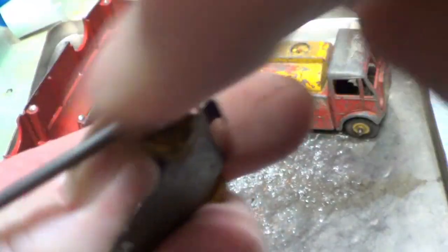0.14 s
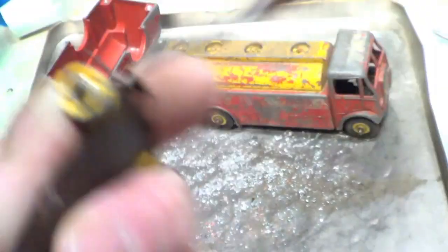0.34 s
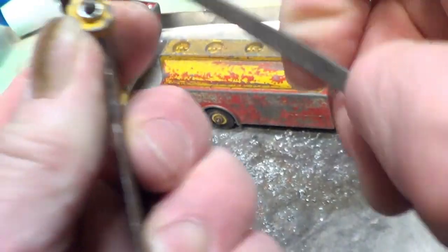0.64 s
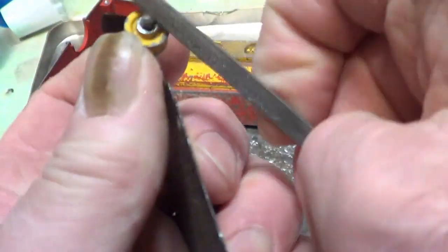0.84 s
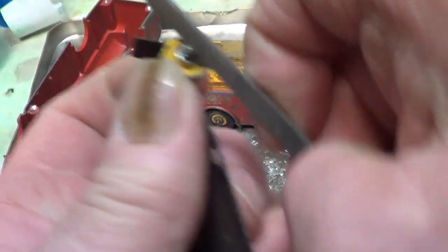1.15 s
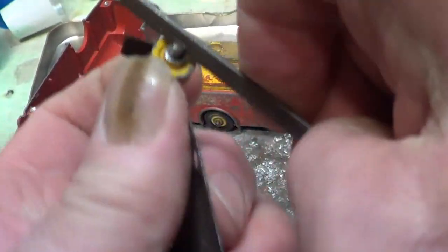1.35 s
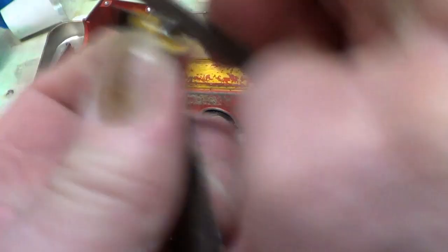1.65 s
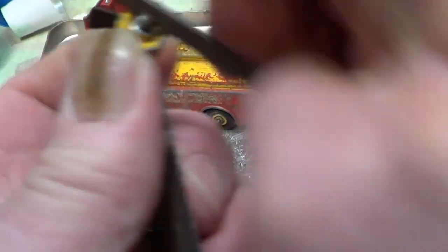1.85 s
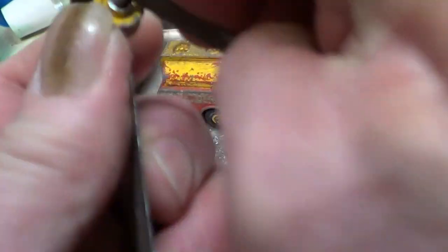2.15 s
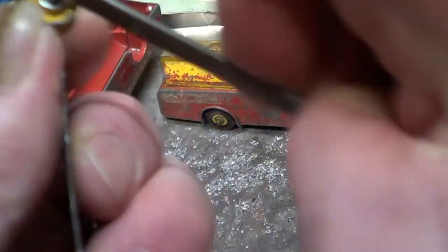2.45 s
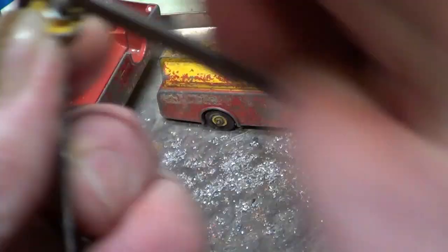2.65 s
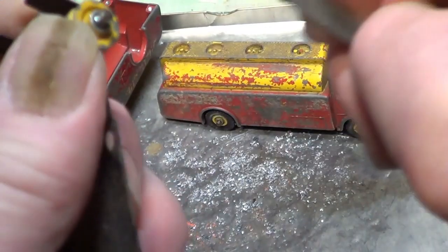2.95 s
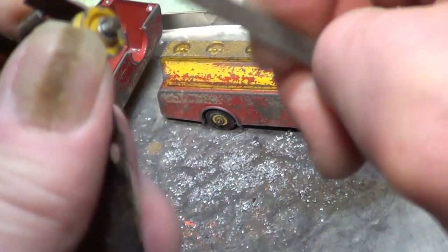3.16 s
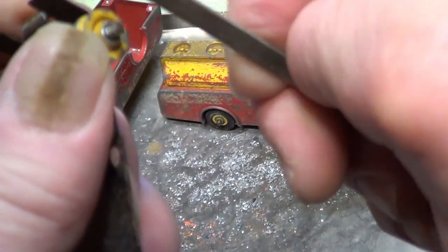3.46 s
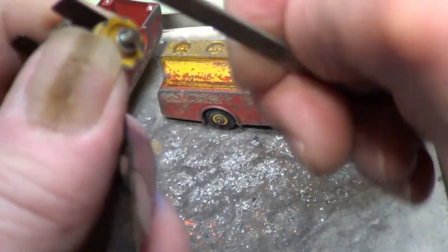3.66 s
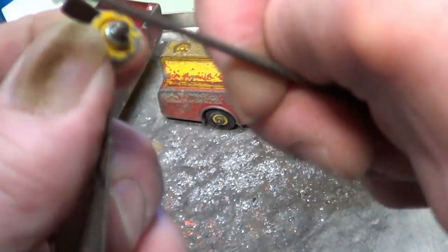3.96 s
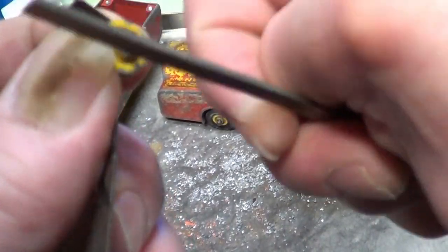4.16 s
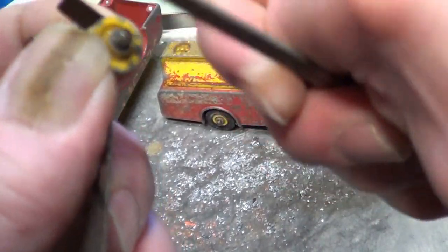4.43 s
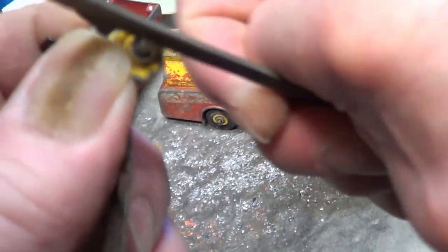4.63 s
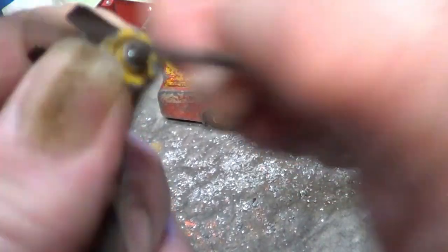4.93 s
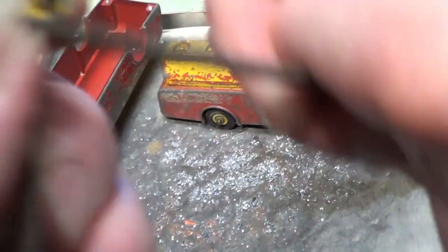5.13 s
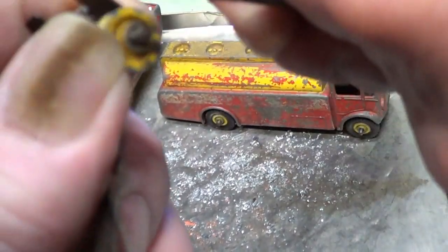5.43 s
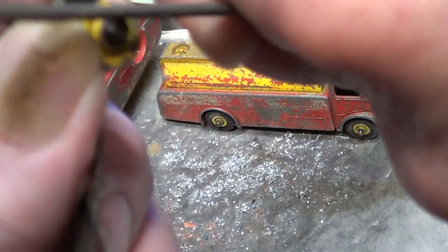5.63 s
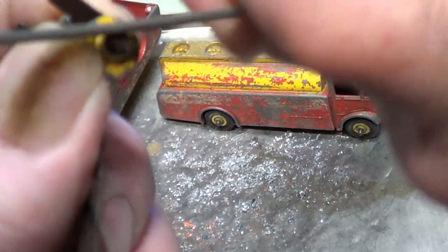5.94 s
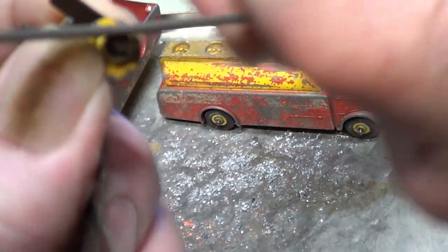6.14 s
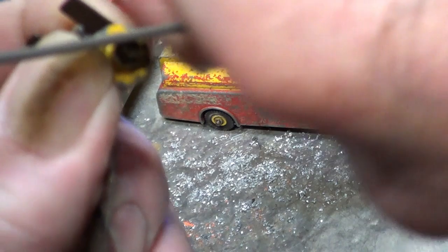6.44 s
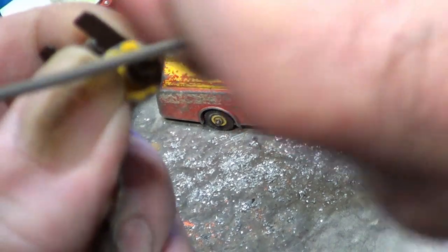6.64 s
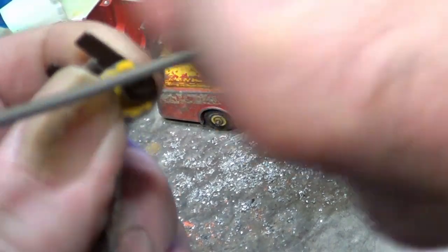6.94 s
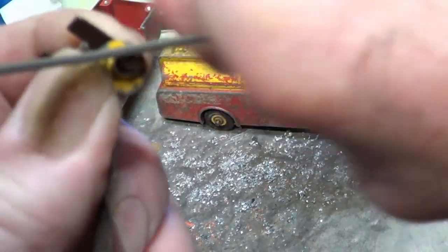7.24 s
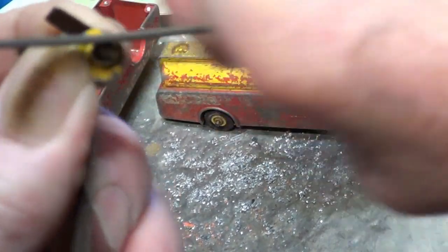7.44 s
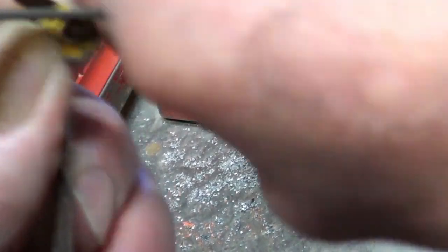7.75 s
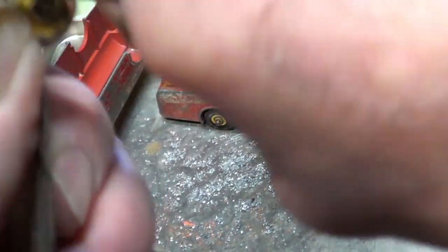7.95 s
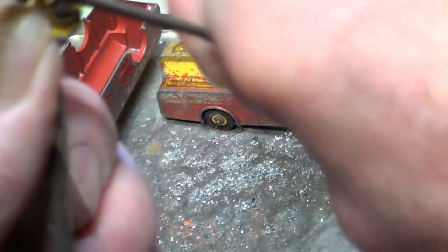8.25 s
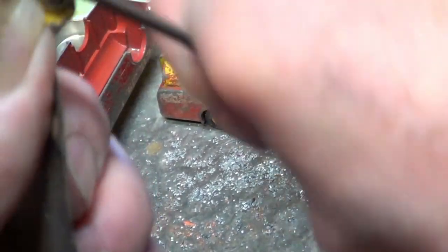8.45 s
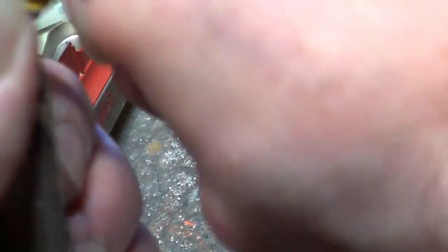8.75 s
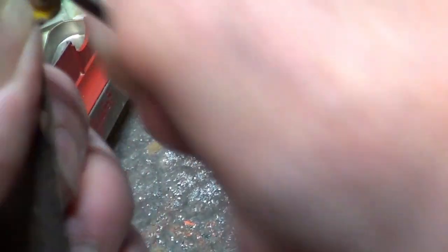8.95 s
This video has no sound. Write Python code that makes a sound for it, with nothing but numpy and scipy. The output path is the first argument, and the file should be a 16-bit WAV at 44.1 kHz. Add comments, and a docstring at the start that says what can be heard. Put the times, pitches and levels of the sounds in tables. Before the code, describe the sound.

Close and dry, in a quiet workshop with faint hiss. From 0 to 0.4 s a few file strokes rasp on metal, growing stronger. A pause follows, with small ticks around 0.65 to 1.05 s. At about 1.2 s filing resumes, soon quick and uneven, push and pull alternating around ten a second, bright, gritty and skipping, loudest around 1.6 s and 2.5 s, stopping at 2.75 s with a sharp tap. Near-silence lasts until about 4.2 s, then come faint ticks, a soft scrape at 4.6 s and harder clicks near 4.95 and 5.1 s. From 5.6 s fine strokes begin softly and settle into a steady, rapid sawing with alternating buzzy notes, low on the push and higher, arching on the pull. From about 7.8 s it becomes rougher, with small taps, continuing to the end at 9.1 s. Thin steel ringing colours each stroke.

```python
"""A small steel file rasps to and fro over the end of a toy axle held in the fingers, heard from close by.
Teeth and grit scrape the axle. The teeth pass at a rate heard as a low note, which falls on a push and
arches on a pull, while file and chassis ring briefly. The file also brushes and taps the work, mostly in
the pauses. Chance grains and pulses drive resonances, with close reflections and a workshop hush behind."""
import sys
import numpy as np
from scipy import signal
from scipy.io import wavfile
from scipy.ndimage import uniform_filter1d

SR = 44100
rng = np.random.default_rng(int(sys.argv[2]) if len(sys.argv) > 2 else 0)


def bounce(signal):
    """Save signal as a 16-bit WAV file at the path given by the first command-line argument."""
    frames = np.transpose(np.atleast_2d(signal))
    limited = np.clip(frames, -1, 1)
    pcm = np.round(limited * 32767).astype(np.int16)
    wavfile.write(sys.argv[1], SR, pcm)


N = 400869

# colour of the rasp with the file held steeply: pitch_hz [Hz], level_db [dB per Hz]
STEEP = [(24, -66.5), (40, -38.5), (155, -28.5), (479, -15), (1180, -14.5), (2100, -3), (2910, -9),
         (5720, -7), (7730, -6), (9220, -5.5), (10400, -9.5), (13100, -17), (16000, -26.5)]
# colour with the file laid flat: pitch_hz [Hz], level_db [dB per Hz]
FLAT = [(24, -102), (40, -46.5), (320, -14.5), (479, -12), (1520, -12.5), (1810, -1.5), (2500, -1.5),
        (3560, -7), (5580, -4), (8340, 6.5), (11600, 1), (14800, -6.5), (16000, -3)]
# colour of the opening strokes, named in the table of grips: pitch_hz [Hz], level_db [dB per Hz]
UNDER = [(24, -70), (40, -40), (269, -16.5), (312, -25), (363, -17.5), (646, -19), (1150, -22),
         (1630, -11.5), (1760, -5), (2100, -3), (3470, -19), (4240, -2.5), (4680, -10), (9690, -1.5),
         (16000, -27.5)]


def gain_of(db):
    """Turns decibels into a factor on the sound pressure."""
    return 10 ** (np.asarray(db) / 20)


def evened(x):
    """Scales a signal to an average strength (RMS) of one."""
    return x / np.sqrt(np.mean(x ** 2) + 1e-20)


def read(points, hz):
    """Reads a table over pitch, with straight lines on a logarithmic pitch scale."""
    f, value = np.transpose(points)
    return np.interp(np.log(hz + 1), np.log(f + 1), value)


def at_time(points, s):
    """Reads a table over time, with straight lines between its points."""
    return np.interp(s, *np.transpose(points))


def drift(per_s):
    """Wanders by chance with unit strength, through per_s random points a second."""
    knots = rng.standard_normal(int(N / SR * per_s) + 2)
    return evened(np.interp(np.arange(N) * per_s / SR, np.arange(len(knots)), knots))


def colour(points, lo_hz, hi_hz):
    """Makes a filter of unit energy from the part of a spectrum between two soft edges."""
    hz = abs(np.fft.fftfreq(4096, 1 / SR)) + 1
    edges = 1 / (1 + (lo_hz / hz) ** 8) / (1 + (hz / hi_hz) ** 8)
    log_gain = np.log(gain_of(read(points, hz)) * np.sqrt(edges) + 1e-5)
    # minimum phase: the filter answers at once, never before its input
    response = np.fft.ifft(np.exp(np.conj(signal.hilbert(log_gain)))).real[:2048]
    return response / np.linalg.norm(response)


def resonate(x, hz, width):
    """A moving resonance: shifts the pitch curve hz down to zero, smooths, and shifts back."""
    turn = np.exp(2j * np.pi * np.cumsum(hz) / SR)
    r = np.exp(-np.pi * width / SR)
    smooth = signal.lfilter([1 - r], [1, -r], x / turn + 1e-18)
    return 2 * (turn * smooth).real


def hush():
    """Room and microphone noise: random spectra with faint drifting patches, partly alike left and right."""
    # loudness of the hush: time_s [s], level_db [dB]
    loudness = [(0, -48.5), (.45, -54.5), (.8, -59), (2.75, -55.5), (3.251, -61), (3.75, -58.5),
                (4.599, -58), (5.5, -60), (9.09, -48.5)]
    # its colour: pitch_hz [Hz], level_db [dB per Hz]
    spectrum = [(24, -59), (40, -29), (155, -13), (312, -12), (422, -4.5), (770, -13), (942, -8),
                (1370, -13), (8340, -13), (16000, -18)]
    # how alike left and right are: pitch_hz [Hz], likeness [-1 to 1]
    likeness = [(60, 0.49), (180, 0.11), (550, -0.018), (1650, 0.49), (4970, 0.095), (15000, 0.7)]
    frames, hz = N // 256 + 5, np.fft.rfftfreq(1024, 1 / SR)
    a, b, c, d, patches = rng.standard_normal((frames, 513, 5)).T
    patches = evened(uniform_filter1d(uniform_filter1d(patches, 20, 0), 16, 1))
    same = np.clip(read(likeness, hz), -1, 1)[:, None]
    left = a + 1j * b
    right = same * left + np.sqrt(1 - same ** 2) * (c + 1j * d)
    z = np.array([left, right]) * gain_of(read(spectrum, hz)[:, None] + 1.7 * patches)
    noise = evened(signal.istft(z, nperseg=1024, noverlap=768)[1][:, :N])
    return gain_of(at_time(loudness, np.arange(N) / SR)) * noise


def bench(x):
    """Close reflections off hands and bench, then a faint room: sparse echoes, other ones for each side."""
    at = np.arange(30, 16000, 20) + rng.integers(0, 20, (2, 799))
    tail, t = np.zeros((2, 16100)), at / SR
    # each part falls by 60 dB in the time it is divided by, in seconds
    decay = gain_of(-60 * t / .015) + gain_of(-12 - 60 * t / 0.12) + gain_of(-43 - 60 * t / .5)
    np.put_along_axis(tail, at, rng.choice([-1., 1.], at.shape) * decay, 1)
    # small surfaces return little bass
    thin = signal.lfilter(*signal.butter(1, [800, 13000], "bandpass", fs=SR), x)
    return signal.oaconvolve(thin[None], tail / np.linalg.norm(tail[0]), axes=1)[:, :N]


def ring(x, wander_db, per_s):
    """Modes of file and chassis; each is driven more or less as the point of contact moves."""
    # resonances: pitch_hz [Hz], width_hz [Hz], level_db [dB]
    modes = [(1917, 230, -9.5), (2255.2, 130, -7), (2527, 100, -4), (2980, 90, -7), (3297, 120, -4),
             (3640, 160, -2), (4100, 900, -16), (4840, 65, -18), (6860, 170, -11), (7860, 110, -2.5),
             (8460, 200, -3.5), (9026, 210, -5), (9500, 70, -13.5), (11400, 250, -8.5)]
    out = np.zeros(N)
    for hz, width, db in modes:
        r = np.exp(-np.pi * width / SR)
        driven = x * gain_of(wander_db * drift(per_s))
        mode = signal.lfilter([1, 0, -1], [1, -2 * r * np.cos(2 * np.pi * hz / SR), r * r], driven)
        out += gain_of(db) * np.sqrt(1 - r) * mode
    return out


def taps():
    """A tick with a fading burst of weaker slips, a dull knock and the ring of the steel."""
    # the file touches or catches on the work: time_s [s], level_db [dB, before mixing],
    # treble_db [dB against the middle band], knock_hz [Hz]
    touches = [(0.5064, -44, -18, 4320), (0.653, -26, -21, 2490), (0.8781, -13.5, 9.5, 3150),
               (0.9843, -43, -13, 2900), (0.9595, -39, -3, 2300), (1.035, -29, 4, 2100),
               (1.0415, -10, 6.5, 3050), (1.52, -20, 8, 2123), (1.955, -42, 18, 2760),
               (2.327, -24, 3, 2580), (2.6051, -18, -6, 3500), (2.7389, 2, -12.5, 5740),
               (2.8074, -42.5, -14, 4340), (3.0394, -50.5, -13, 2114), (4.2717, -21.5, -19, 2360),
               (4.3269, -17, 6.5, 3540), (4.5347, -29.5, -18, 1900), (4.8202, -27.5, -20, 2150),
               (4.9585, -5.5, -17.5, 2299), (5.0816, -18, -9, 2263), (5.09, -0.5, -24, 5070),
               (5.533, -21.5, 3.5, 2400), (5.5377, -15, -5, 2382), (7.809, -9.5, 4, 2480),
               (7.9931, -21, -14, 2370), (8.2967, -12, -17, 2693), (8.3713, -12.5, -18, 2508)]
    blows, bright, knocks = np.zeros((3, N))
    t = np.arange(600) / SR
    for s, db, treble_db, knock_hz in touches:
        slips = 0.24 * rng.standard_normal(600) * gain_of(-60 * t / 0.01443)
        blow = gain_of(db) * (slips + (t == 0))
        knock = gain_of(-60 * t / .007) * np.cos(2 * np.pi * knock_hz * t)
        i = round(s * SR)
        blows[i:i + 600] += blow
        bright[i:i + 600] += gain_of(treble_db) * blow
        knocks[i:i + 600] += np.convolve(blow, knock)[:600]
    middle = signal.oaconvolve(blows, colour(FLAT, 1100, 5000))
    top = signal.oaconvolve(bright, colour(STEEP, 6000, 20000))
    steel = ring(bright, wander_db=4.0, per_s=16)
    return gain_of(-7.5) * (middle + top)[:N] + gain_of(-15.5) * knocks + gain_of(-20.5) * steel


def hand():
    """Moves the file: pressure, tone and pitch of strokes and brushes, sample by sample."""
    # filing strokes, push and pull in turn: start_s [s], end_s [s], level_db [dB, before mixing], # bite_db
    # [first bite, dB against the level that follows], swell_db [rise over the stroke, dB], # treble_db [dB
    # against the middle band], note_hz [tooth note midway, Hz]
    strokes = [(0.0, 0.021, -26.5, 15, -6.5, 1.5, 539), (0.044, 0.135, -25.5, -4, -0.5, 1, 700),
               (0.16, 0.25, -18.5, -2.5, 6.5, 5.5, 616), (0.27, 0.368, -11.5, -7.5, 4.5, 5.5, 660),
               (1.163, 1.266, -29, -5, 6.5, -5, 790), (1.296, 1.367, -16.5, -8.5, -1, 3, 764),
               (1.42, 1.496, -25.5, -8, 7.5, -3, 619), (1.535, 1.62, -16.5, -4.5, 2, 3, 1051),
               (1.643, 1.722, -14, 0, 4, 0, 1242), (1.754, 1.836, -17, -3, -3.5, -0.5, 1009),
               (1.87, 1.942, -19.5, -1, 0, -1, 921), (1.987, 2.054, -18, -1, -1, -0.5, 327),
               (2.084, 2.153, -19, -12, 1.5, -0.5, 1037), (2.215, 2.248, -18.5, -2.5, 3.5, 0.5, 1066),
               (2.338, 2.39, -19, 2.5, -3.5, -5.5, 672.5), (2.429, 2.512, -13.5, -2, -1, -3.5, 1077),
               (2.531, 2.611, -13.5, -3, -4.5, -2.5, 1108), (2.638, 2.749, -16, -6.5, 1, 1, 1248),
               (5.625, 5.676, -36, 2.5, -1.5, 2.5, 520), (5.697, 5.752, -30, -10, -1, 1.5, 681),
               (5.784, 5.854, -18.5, -10, -1, 2.5, 509.8), (5.879, 5.952, -28, -9, -4, 1.5, 570),
               (5.979, 6.048, -25, -6.5, -2, 1.5, 525.5), (6.07, 6.147, -28, -9.5, 0, 1.5, 615),
               (6.168, 6.231, -23.5, -4.5, 3, 1.3, 541.6), (6.256, 6.331, -25.5, -3.5, 0, 2.5, 630),
               (6.355, 6.429, -21, -7, 2.5, 1, 499.3), (6.454, 6.531, -23, -6, 0, 0.8, 690),
               (6.554, 6.633, -20, -7, 3, 1, 491.4), (6.655, 6.731, -21.5, -9.5, -2.5, 2.2, 850),
               (6.756, 6.821, -17, -6, 3.5, 1.5, 479.3), (6.841, 6.918, -17.5, -12, -3, 5.5, 890),
               (6.937, 7.008, -21, -7.5, -1, 2, 529.3), (7.022, 7.105, -24.5, -3, 1.5, 3.5, 905),
               (7.124, 7.206, -18, -3.5, -2, -0.8, 558.8), (7.224, 7.297, -29, -9, -1, 2, 681),
               (7.313, 7.396, -20, -4.5, 2, -1.2, 521.4), (7.415, 7.493, -22.5, -7, -1, 0.9, 904.6),
               (7.508, 7.593, -19, -6, -0.5, 1, 559), (7.61, 7.698, -20, -6.5, -0.6, 1.5, 946.3),
               (7.711, 7.782, -16, -2.5, -2, 1.5, 576.4), (7.808, 7.888, -21.5, -6.5, -0.8, -0.5, 757),
               (7.911, 7.973, -18.5, -0.5, -4, 1.5, 576), (8.012, 8.08, -21.5, -7, -4, -3.5, 681),
               (8.109, 8.167, -16.5, 6.5, 4, -3, 648.6), (8.205, 8.279, -24, -1, -1.5, -4, 700.4),
               (8.298, 8.383, -17.5, -9.5, -5, 0.6, 551), (8.411, 8.48, -25.5, -1.5, -3.5, -3, 610),
               (8.506, 8.583, -17.5, -5, -0.2, -1.5, 660), (8.605, 8.691, -19, -6.5, -8, -1.5, 616.6),
               (8.708, 8.788, -17, -2.5, -2.5, -2, 720.6), (8.812, 8.883, -17, -1.5, 4, 0, 619),
               (8.905, 8.984, -16.5, -0.5, -1.3, -5.5, 649), (9.011, 9.079, -27, 5, 1.5, -2.5, 750)]
    # the file brushes the work while it is set in place: the same columns
    brushes = [(0.925, 0.967, -53.5, -2.5, -3, -4, 1070), (4.147, 4.182, -59, 0.3, -1.5, 4, 1110),
               (4.295, 4.319, -46, 2, 2, 0, 458), (4.572, 4.595, -50, 4.5, -6, 8, 507),
               (4.613, 4.694, -30, -13, 1.5, -3, 670), (4.701, 4.725, -30, 19, 1.5, -0.5, 732),
               (4.951, 4.982, -16.5, -5.5, 1.5, 4.5, 684.6), (4.983, 5.012, -44, 2, 1.5, 15, 1160),
               (5.028, 5.062, -46, -3, -8, 3.5, 1072), (5.08, 5.116, -27, 12.5, -5, 9, 1148),
               (5.307, 5.342, -57.5, 6, 0, -5.5, 390)]
    # how the file is held: time_s [s], side_db [left against right, dB, before the weighting by pitch],
    # coarse_db [strength of skipping, dB, before an offset and a factor],
    # thud_db [dB against the middle band in a stroke of -21 dB],
    # push_hz and pull_hz [loudest band of the blade on a push and on a pull, Hz]
    hold = [(0, 2, 4.2, -15, 2900, 2900), (0.2, 0.8, 2.52, -7.5, 3100, 2700),
            (0.369, 0.8, 2.6, -17, 3000, 2200), (0.95, 0, 2.1, -27, 2800, 2800),
            (1.161, 0, 2.6, -16, 2150, 3300), (1.35, -0.6, 6.9, -9.5, 2560, 3300),
            (1.6, 0.5, 1.7, -15.5, 2800, 2900), (1.85, -0.7, 3.6, -11, 2810, 3000),
            (2.2, 1.5, 4.76, -8, 3050, 2900), (2.5, -0.1, 2.63, -13.5, 2710, 2870),
            (2.75, 2, 4.1, -9, 2700, 2850), (4.15, 3, 1.5, -19.5, 2880, 2900),
            (4.6, 2.5, 7.5, -12.5, 2343, 2350), (4.97, 2.2, 5.4, -7.5, 2560, 2600),
            (5.05, 1.8, 1.86, -28, 2680, 2700), (5.63, 2.5, 5.1, -9.5, 2485, 2350),
            (6.1, 2.5, 2.3, -9, 2467, 2420), (6.9, 1.9, 2.34, -9.5, 2538, 2550),
            (7.8, 2, 2.07, -10.5, 2750, 2450), (8.2, 2.4, 2.95, -10, 2650, 3150),
            (9.09, 2.4, 2.3, -12, 3155, 3280)]
    # how far the loudest band sinks over a stroke (negative: rises): time_s [s], sag [share]
    blade_sag = [(0.2, .15), (0.32, 0.49), (1.2, 0.013), (1.58, -0.19), (1.68, 0.5), (1.8, .04),
                 (2.6, 0.031), (7.6, -0.056), (7.75, -0.31), (7.9, 0.042), (8.05, 0.0086), (9.09, .03)]
    # how the tooth note bends on push, pull, brush: bend [exponent]; a push slides evenly, a pull arches
    note_bend = (1.1, 1.8, 1.1)
    note_ends = ((1.45, .62), (.48, .45), (1.02, 1))  # tooth note early and late against midway
    note_middle = .57  # share of the stroke; a pull is fastest here
    bite_end, lift_start, lift_end = .3, 0.79, .93  # shares of the stroke
    arch_db = 0.68  # pressure midway, above the stroke's level
    lift_db, lift_per_db = -10.5, .2  # easing off in a stroke of -20 dB; hard strokes ease off less
    thud_per_db = -0.2956  # the thud grows less than the rasp
    coarse_push_db = 0.32  # a push skips more than a pull
    creep_s, bite_s = .01, .0035  # creeping before a stroke and reaching full bite, seconds
    creep_db, creep_per_db = -27, -1.4  # a stroke creeps off faintly, less so before a hard first bite

    level, thud, treble, side_db, skip_db, tooth_hz, blade_hz = np.zeros((7, N))
    s, *held = np.transpose(hold)
    ways = [(row, k % 2) for k, row in enumerate(strokes)]  # 0 push, 1 pull
    ways += [(row, 2) for row in brushes]  # 2 brush
    for (start, end, db, bite_db, swell_db, treble_db, note_hz), way in sorted(ways):
        middle_s = (start + end) / 2
        pan_db, coarse_db, thud_db, push_hz, pull_hz = (np.interp(middle_s, s, c) for c in held)
        i, j = max(round((start - creep_s) * SR), 0), min(round((end + .02) * SR), N)
        u = (np.arange(i, j) / SR - start) / (end - start)  # share of the stroke done
        since = u * (end - start)

        fade_db = -4000 * (end - start) * np.maximum(u - 1, 0)  # the file stops
        creep = (way < 2) * gain_of(creep_db + creep_per_db * bite_db)  # strokes only
        bite = np.interp(since, [-creep_s, 0, bite_s], [0, creep, 1])
        early_db, late_db = db - swell_db / 2, db + swell_db / 2
        eased_db = late_db + lift_db + lift_per_db * (db + 20)
        shape_db = np.interp(u, [.08, bite_end, (bite_end + lift_start) / 2, lift_start, lift_end],
                             [early_db + bite_db, early_db, db + arch_db, late_db, eased_db])
        level[i:j] = np.maximum(level[i:j], bite * gain_of(shape_db + fade_db))

        # these hold until the next stroke or brush
        thud[i:] = gain_of(thud_db + thud_per_db * (db + 21))
        treble[i:], side_db[i:] = gain_of(treble_db), pan_db
        skip_db[i:] = coarse_db + coarse_push_db * (way == 0) - coarse_push_db * (way == 1)

        early, late = note_ends[way]
        away = np.minimum(abs(u - note_middle) / note_middle, 1) ** note_bend[way]
        tooth_hz[i:j] = note_hz * (1 - (1 - np.where(u < note_middle, early, late)) * away)
        sag = at_time(blade_sag, middle_s) * (np.minimum(u, 1) - .5)
        blade_hz[i:j] = (pull_hz if way == 1 else push_hz) * (1 - sag)
    level = level / np.sqrt(1 + treble ** 2)  # makes up for the strength that treble adds
    return level, thud, treble, skip_db, tooth_hz, blade_hz, side_db


def rasp(level, thud, treble, skip_db, tooth_hz, blade_hz):
    """Tooth bumps and grit drive hand, axle and file."""
    # unevenness of the tooth rate: time_s [s], unevenness [share]
    wobble = [(0, .2), (5.6, .2), (5.8, .045), (6.9, .045), (7.4, .13), (9.09, .2)]
    # grips of the file: start_s [s], end_s [s], tone_share [factor on the tooth note], # spectrum [one of the
    # colours]
    grips = [(0, .7, .4, UNDER), (.7, 3.5, .3, STEEP), (3.5, 7.305, 2.0, FLAT), (7.305, 9.1, 1.5, FLAT)]
    uneven = at_time(wobble, np.arange(N) / SR) * drift(300)
    turns = np.cumsum(tooth_hz * (1 + uneven)) / SR  # teeth passed so far
    passing = np.diff(np.floor(turns), prepend=0) > 0
    teeth = evened(passing * gain_of(2.1 * rng.standard_normal(N)))

    sizes = gain_of(2.5 * np.minimum(rng.exponential(1, N), 4)) * rng.choice([-1, 1], N)
    grains = sizes * (rng.random(N) < 11000 / SR)  # about 11000 grains a second
    grit = evened(grains * (.6 + np.exp(-(turns % 1) / .35)))  # strongest just after each tooth

    # the file skips and digs in, while the hand keeps the mean pressure
    skips = gain_of(1.6 * np.maximum(skip_db - 1.44, 0) * np.clip(drift(480), -2.5, 2))
    pressure = level * skips / np.sqrt(uniform_filter1d(skips ** 2, 600))
    drive = pressure * (0.3 * teeth + 0.84 * grit)

    # a resonance follows the tooth note; it is driven more strongly # the higher it is, as the grip's colour
    # weakens it
    tone = tooth_hz / 600 * resonate(drive, tooth_hz, 65)
    # the free length of the blade moves the loudest band
    blade = .5 * drive + 1.71 * resonate(drive, blade_hz, 700)
    out = gain_of(-15) * ring(drive, wander_db=5.5, per_s=14)
    for start, end, tone_share, spectrum in grips:
        grip = slice(round(start * SR), round(end * SR))
        low = (.85 * drive + tone_share * tone) * thud
        bands = ((low, 1, 1450), (.65 * blade, 1450, 5000), (.8 * drive * treble, 5000, 20000))
        for x, lo_hz, hi_hz in bands:
            out[grip] += signal.oaconvolve(x[grip], colour(spectrum, lo_hz, hi_hz))[:len(out[grip])]
    return out


def place(work, side_db):
    """Places the work between left and right by level, more at some pitches than at others."""
    # share of the left-right difference: pitch_hz [Hz], share [factor]
    lean = [(60, 0.17), (700, 0.085), (1300, 1.9), (2400, 1.2), (4400, 0.6), (8000, 0.98), (15000, 0.045)]
    hz, t, z = signal.stft(work, SR, nperseg=256)
    lean_db = read(lean, hz)[:, None] * np.interp(t, np.arange(N) / SR, side_db) / 2
    return signal.istft(z * gain_of([lean_db, -lean_db]), SR, nperseg=256)[1][:, :N]


def scene():
    """Adds filing and taps, their reflections and the hush."""
    *controls, side_db = hand()
    work = rasp(*controls) + taps()
    return place(work, side_db) + gain_of(-10.0) * bench(work) + hush()


def record(dry):
    """Cuts peaks off at full scale, then removes what lies above the upper band edge."""
    low_pass = signal.firwin(301, 15800, window=("kaiser", 9), fs=SR)  # edge in Hz
    return signal.oaconvolve(np.clip(dry, -1, 1), low_pass[None], "same")


dry = scene()
out = record(dry)
bounce(out)
```